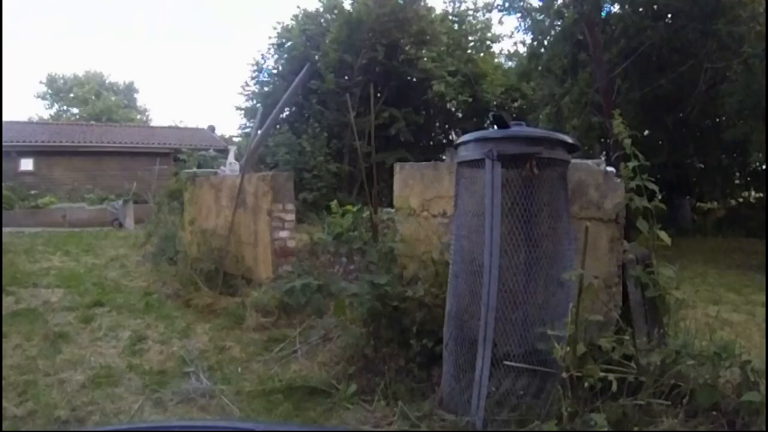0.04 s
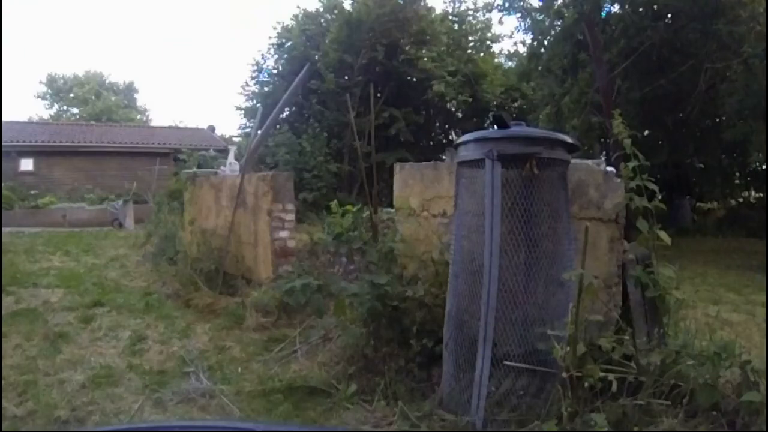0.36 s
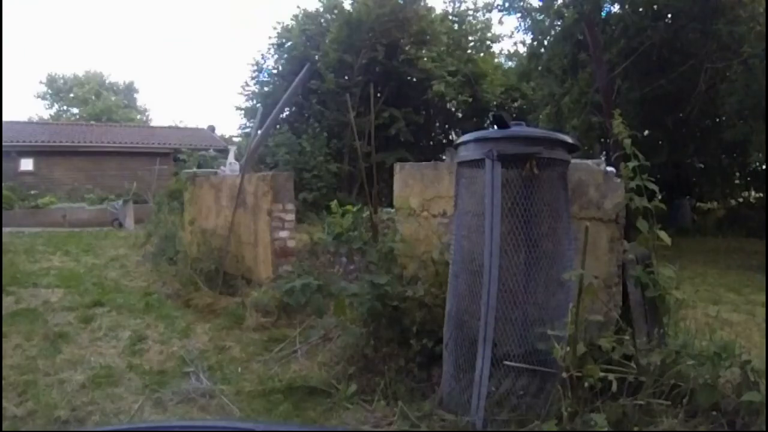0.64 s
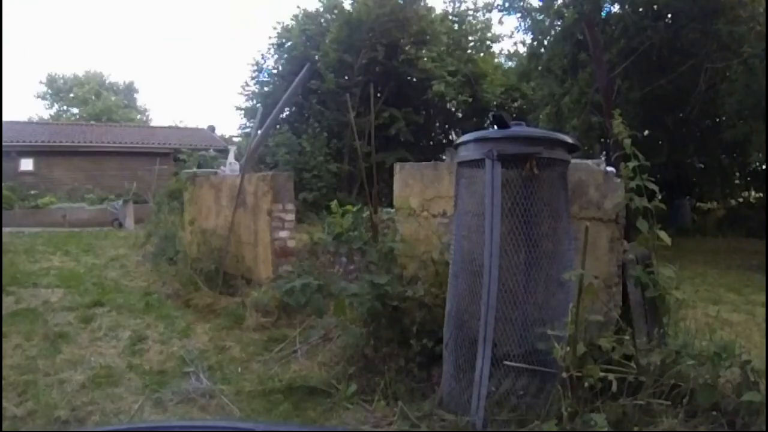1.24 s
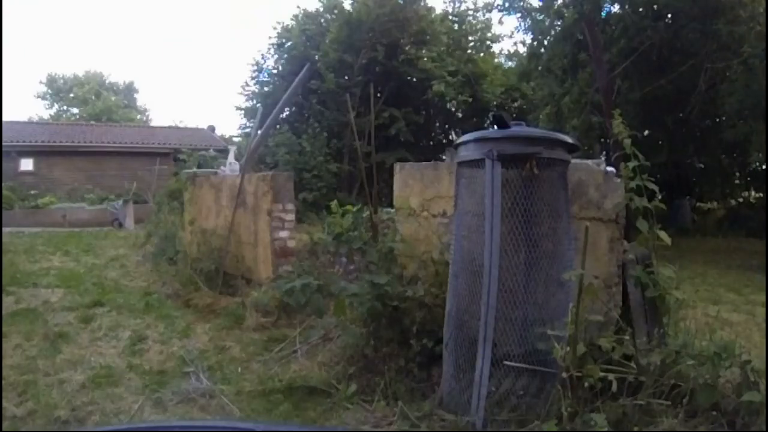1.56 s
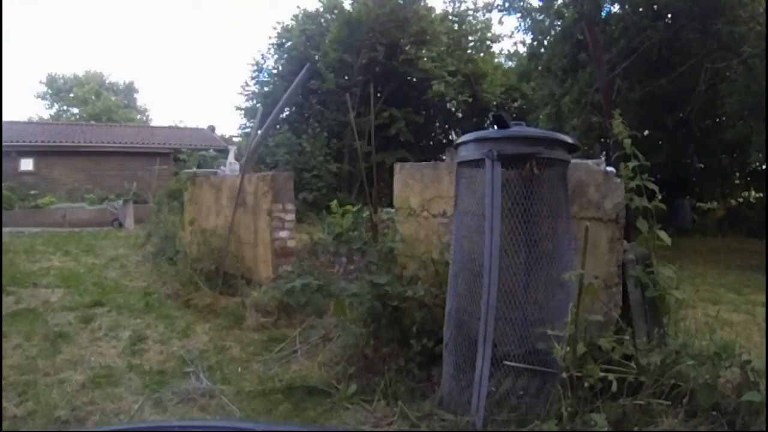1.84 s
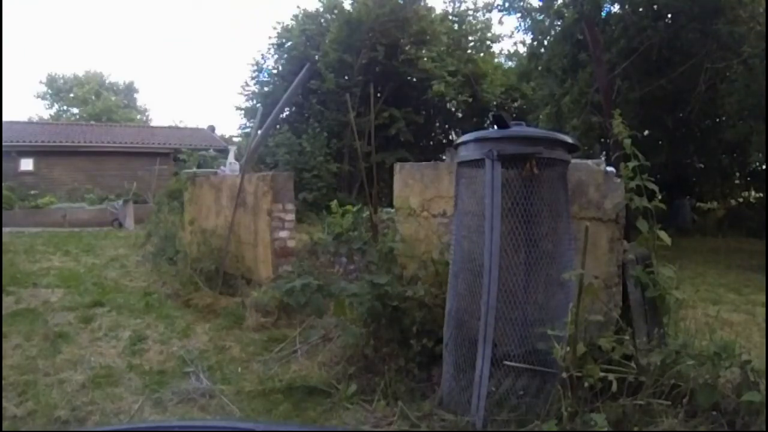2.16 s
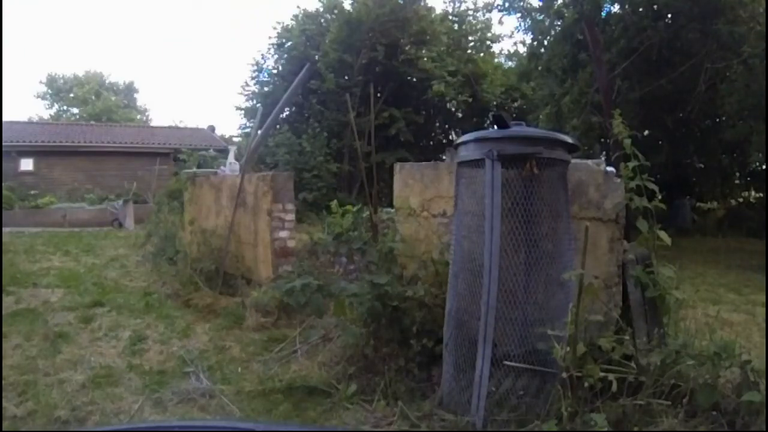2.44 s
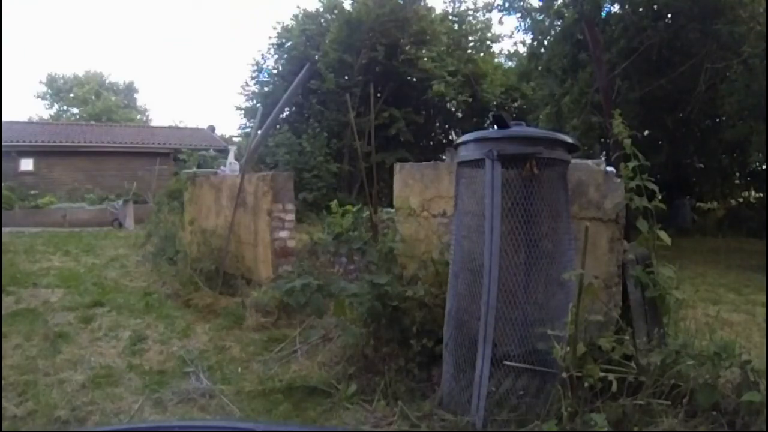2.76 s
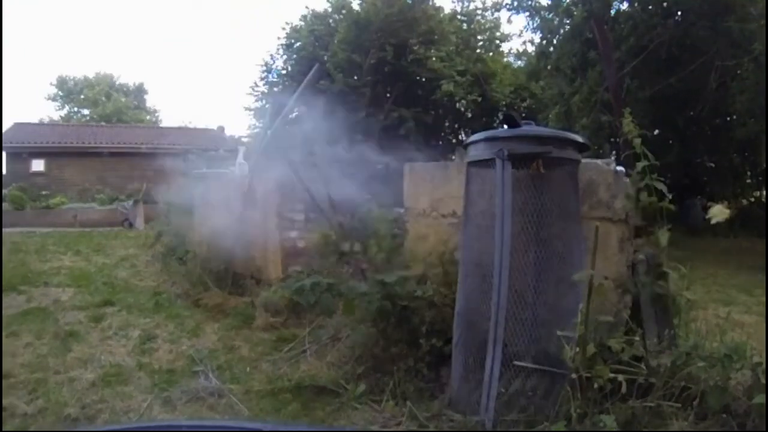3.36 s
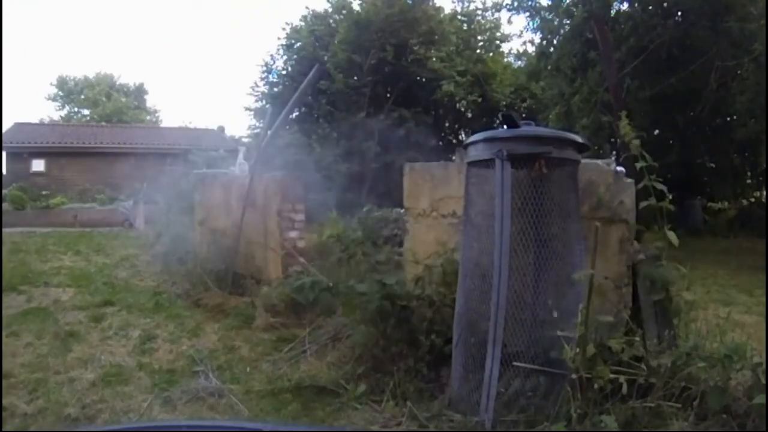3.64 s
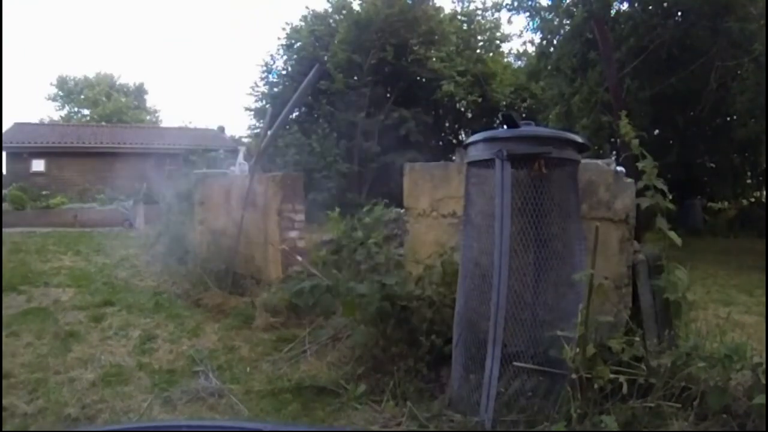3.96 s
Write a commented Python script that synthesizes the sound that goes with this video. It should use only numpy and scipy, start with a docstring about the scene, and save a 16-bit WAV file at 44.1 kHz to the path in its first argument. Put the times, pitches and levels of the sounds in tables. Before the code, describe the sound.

A spud cannon shot hits a plastic trash can in a quiet yard. First there is a faint low rumble and thin electronic whine, with a tiny igniter click near 1.1 seconds and a clearer one at 2.1. At 3.2 seconds a split-second gas hiss ends in a loud, distorted slam beside the microphone. Echoes roll back from a wall and trees, and bits patter down from 3.6 to 4 seconds.

```python
"""A quiet yard, one camera microphone beside a plastic trash can. A spud cannon's igniter clicks in vain,
then gas rushes out ever harder and the slug slams into the can, overloading the microphone. A wall and
the tree line throw the bang back, and bits of the slug patter down. Under it lie a low outdoor rumble
and the camera's thin whine."""
import sys
import numpy as np
from scipy import signal
from scipy.fft import rfft, irfft, next_fast_len
from scipy.io import wavfile
from scipy.ndimage import uniform_filter1d, map_coordinates

SR = 44100
rng = np.random.default_rng(int(sys.argv[2]) if len(sys.argv) > 2 else 0)


def bounce(signal):
    """Save signal as a 16-bit WAV file at the path given by the first command-line argument."""
    frames = np.transpose(np.atleast_2d(signal))
    limited = np.clip(frames, -1, 1)
    pcm = np.round(limited * 32767).astype(np.int16)
    wavfile.write(sys.argv[1], SR, pcm)


N = 176400

SLAM_S, PUSH_S, PUSH_DB, RING_DELAY_S = 3.2378, .0012, 17, .0011
CRACK_DB, CRACK_T60_S = -4.5, .095
# modes of the can, close up: pitch_hz, level_db, t60_s
CAN_MODES = [(42, -14, .2), (138, -7, .25), (178.5, -4, .24), (238, -3, .11), (310, -7, .1), (443, -2, .1),
             (510, -8, .07), (595, -9, .1), (790, -9, .11), (975, -5, .085), (1380, -19, .16),
             (1590, -10, .06), (1740, 22, .0095), (1990, -11, .09)]
# spectra of the bursting slug, the gas jet and the igniter: freq_hz, level_db
CRACK_COLOUR = [(40, -6), (300, -1), (1000, -3), (2400, -6), (4000, -12), (7000, -25), (15000, -38)]
JET_COLOUR = [(60, -18), (120, -10), (300, -13), (750, -4), (1080, -5), (1250, -12), (1850, 1), (2400, -2),
              (2950, -10), (3500, -2), (4000, -6), (4500, -1.5), (6000, -11), (7500, -11), (10400, -5),
              (11800, -7), (13000, -13), (15000, -17)]
CLICK_COLOUR = [(200, -20), (600, -8), (1700, 4), (2700, -4), (3600, -1), (5000, -9), (6600, -4),
                (8800, -11), (10400, -1), (12500, -14), (15000, -15)]
JET_START_S, JET_PEAK_S, JET_END_S = 3.171, 3.2245, 3.24
JET_DB, JET_SWELL_DB, JET_CURVE, JET_T60_S = -8, 34, 1.45, .022
# igniter snaps: start_s, level_db
CLICKS = [(1.066, -50), (2.0905, -30), (2.176, -56)]
CLICK_T60_S, CLICK_ROOM_DB = .016, -9

# returns of the bang, near to far: peak_s, level_db, rise_s, t60_s
YARD_ECHO = (3.255, -15.5, .01, .72)
WALL_ECHO = (3.322, -11.5, .012, .065)
TREE_ECHO = (3.455, -17, .17, .28)
HOLLOW_ECHO = (3.46, -30, .15, .45)
FAR_ECHO = (3.58, -32, .1, .85)
# spectra of those returns: freq_hz, level_db
YARD_COLOUR = [(24, -45), (40, -15), (191, 1), (422, -12), (554, -7), (980, -8), (1220, -17), (1350, -8),
               (1530, -18), (2510, -16), (3740, -19), (4030, -23), (7120, -37), (10100, -37), (15000, -49)]
WALL_COLOUR = [(50, 0), (130, 4), (400, -14), (800, 2), (1100, -8), (1600, -8), (2500, -22), (8000, -50)]
TREE_COLOUR = [(24, -48), (40, -18), (108, -10), (128, -15), (164, -2), (251, -18), (337, -9), (382, -28),
               (422, -16), (659, -14), (746, -2), (1320, -27), (1780, -21), (2450, -30), (3650, -32),
               (10100, -54), (15000, -67)]
FAR_COLOUR = [(40, -10), (135, 12), (200, -4), (500, -12), (900, -9), (1300, -21), (2200, -22), (5000, -34),
              (12000, -64)]
# resonances of the hollow-sounding return: pitch_hz, width_hz, level_db
HOLLOW_PEAKS = [(748, 22, 0), (815, 40, -6), (172, 25, 1)]
# decay of the scatter close by: freq_hz, t60_s
SCATTER_T60 = [(200, .35), (3000, .35), (7000, .2), (14000, .1)]

# bits of slug landing: start_s, ring_db, pitch_hz, t60_s, tick_db
BITS = [(3.63, -50, 1000, .03, -38), (3.671, -43, 1550, .04, -56), (3.7485, -21, 790, .055, -25),
        (3.7985, -35, 1010, .025, -31), (3.833, -35, 966, .04, -54), (3.883, -41, 900, .08, -49),
        (3.929, -45, 1740, .03, -60), (3.938, -53, 4600, .015, -56), (3.9635, -33, 1100, .07, -60),
        (3.977, -42, 950, .06, -64)]
# modes of a landing: pitch_ratio, level_db
BIT_MODES = [(.42, -14), (1, 0), (1.2, -7), (1.8, -11)]
TICK_T60_S, THUD_DB, BIT_ROOM_DB = .007, -3, -11
# fine crumbs sifting through leaves: peak_s, level_db, rise_s, t60_s
CRUMBS = (3.86, -47, .6, 2.5)
# spectra of the debris: freq_hz, level_db
TICK_COLOUR = [(200, 0), (1500, 0), (2700, -7), (4800, -4), (6500, -12), (12000, -16), (15000, -28)]
THUD_COLOUR = [(100, -6), (300, 0), (1000, 0), (1900, -4), (2600, -17), (6000, -30), (14000, -45)]
CRUMB_COLOUR = [(100, -15), (950, 0), (1300, -5), (1900, -3), (2600, -10), (4800, -11), (7000, -21),
                (14000, -34)]

AIR_DB, AIR_WAVER_DB, AIR_WAVER_HZ = -53, .7, 8
# spectra of the open air and the leaves: freq_hz, level_db
AIR_COLOUR = [(12, -18), (22, 0), (52, 1), (66, -4), (90, -11), (140, -14), (310, -19), (410, -19),
              (480, -17), (560, -23), (980, -25), (1300, -31), (2600, -31), (3300, -36), (5500, -38),
              (7100, -42), (8600, -40), (9500, -46), (11000, -43), (13000, -48), (14200, -49), (15000, -58)]
RUSTLE_COLOUR = [(100, -12), (400, 1), (900, 0), (1400, -12), (2200, -10), (4500, -15), (14000, -27)]
# one stir of leaves: peak_s, level_db, rise_s, t60_s
RUSTLE = (1.76, -57, .3, .3)
# the camera's hiss bands: pitch_hz, width_hz, level_db
WHINE_PEAKS = [(11230, 580, 0), (10100, 500, -10)]
# its steady tones: pitch_hz, level_db
WHINE_TONES = [(2640, -82), (3110, -88), (10330, -92)]
WHINE_DB, BLIP_HZ, BLIP_DB = -73, 11950, -75
BLIP_S, BLIP_PERIOD_S, BLIP_START_S = .007, .0625, .0215
# fade-in of the background: time_s, gain_db
FADE_IN = [(.1, -70), (.115, -11), (.3, -6), (.52, 0)]

GAIN_TRIP_DB, GAIN_CUT_DB, GAIN_RECOVER_DB_PER_S = -14, 10, 15
GAIN_SENSE_S, GAIN_REACT_S, GAIN_HOLD_S = .004, .0175, .23
CLIP_HARDNESS, TOP_HZ = 5, 15200


def slam():
    """The slug hits beside the microphone: one pressure push, the can's ring, the crack as it bursts."""
    age = np.maximum(clock() - SLAM_S, 0) / PUSH_S
    push = -amp(PUSH_DB) * age * (2 - age) * np.exp(-age)
    crack = amp(CRACK_DB) * decay(SLAM_S + RING_DELAY_S, CRACK_T60_S) * noise(CRACK_COLOUR)
    return push + ring(SLAM_S + RING_DELAY_S, CAN_MODES) + crack


def gas_jet():
    """Turbulent gas swells to a loud hiss, holds, and dies just after the slug hits."""
    t = clock()
    to_go = np.clip((JET_PEAK_S - t) / (JET_PEAK_S - JET_START_S), 0, 1)
    fall_db = 60 * np.maximum(t - JET_END_S, 0) / JET_T60_S
    level_db = JET_DB - JET_SWELL_DB * to_go ** JET_CURVE - fall_db
    return (t > JET_START_S) * amp(level_db) * noise(JET_COLOUR)


def igniter():
    """Dry snaps of the spark button, with a little of the yard around them."""
    snaps = noise(CLICK_COLOUR) * sum(amp(db) * decay(start_s, CLICK_T60_S) for start_s, db in CLICKS)
    return snaps + amp(CLICK_ROOM_DB) * near_scatter(snaps)


def echoes():
    """The bang comes back, diffused, from the yard, a wall, the tree line and the far distance."""
    paths = [(YARD_ECHO, YARD_COLOUR), (WALL_ECHO, WALL_COLOUR),
             (TREE_ECHO, TREE_COLOUR), (FAR_ECHO, FAR_COLOUR)]
    diffuse = sum(swell(*path) * noise(colour) for path, colour in paths)
    hollow = swell(*HOLLOW_ECHO) * resonant_noise(HOLLOW_PEAKS)
    return (clock() > SLAM_S) * (diffuse + hollow)


def debris():
    """Each bit lands with a short ring, a leafy thud and a tick; crumbs sift through the leaves."""
    ticks, thuds, landings = noise(TICK_COLOUR), noise(THUD_COLOUR), np.zeros(N)
    for start_s, ring_db, pitch_hz, t60_s, tick_db in BITS:
        modes = []
        for ratio, mode_db in BIT_MODES:
            detune, spread_db = rng.normal(1, .015), rng.normal(0, 1.5)
            mode_hz = pitch_hz * ratio * detune
            modes.append((mode_hz, ring_db + mode_db + spread_db, t60_s / np.sqrt(ratio)))
        thud = amp(ring_db + THUD_DB) * decay(start_s, t60_s) * thuds
        tick = amp(tick_db) * decay(start_s, TICK_T60_S) * ticks
        landings += ring(start_s, modes) + thud + tick
    crumbs = (clock() > SLAM_S) * swell(*CRUMBS) * noise(CRUMB_COLOUR)
    return landings + amp(BIT_ROOM_DB) * near_scatter(landings) + crumbs


def near_scatter(x):
    """Short reflections off nearby walls and bushes; the treble dies first."""
    hz, t, spectrum = signal.stft(rng.standard_normal(SR // 2), SR, nperseg=256)
    damping = amp(-60 * t / along(SCATTER_T60, hz)[:, None])
    tail = signal.istft(spectrum * damping, SR, nperseg=256)[1]
    return signal.fftconvolve(x, tail / np.linalg.norm(tail))[:N]


def outdoor_air():
    """A low, slightly wavering rumble all round, and one stir of leaves."""
    knots = rng.standard_normal(int(N * AIR_WAVER_HZ / SR) + 4)
    waver = map_coordinates(knots, [clock() * AIR_WAVER_HZ])
    rumble = amp(AIR_DB + AIR_WAVER_DB * waver) * noise(AIR_COLOUR)
    return rumble + swell(*RUSTLE) * noise(RUSTLE_COLOUR)


def camera_whine():
    """The camera's own noise: a narrow hiss, steady tones and high pulsing blips."""
    t = clock()
    tones = sum(amp(db) * np.sqrt(2) * np.sin(2 * np.pi * hz * t) for hz, db in WHINE_TONES)
    gate = np.sin(np.pi * np.minimum((t - BLIP_START_S) % BLIP_PERIOD_S / BLIP_S, 1))
    blips = amp(BLIP_DB) * gate * 2 * np.sin(2 * np.pi * BLIP_HZ * t)
    return amp(WHINE_DB) * resonant_noise(WHINE_PEAKS) + tones + blips


def gain_control(x):
    """A loud sound makes the camera's gain step down a moment later, hold, then creep back."""
    t = clock()
    loud = uniform_filter1d(x * x, int(GAIN_SENSE_S * SR)) > amp(GAIN_TRIP_DB) ** 2
    since_loud_s = t - np.maximum.accumulate(np.where(loud, t, -10))
    recovered_db = GAIN_RECOVER_DB_PER_S * np.maximum(since_loud_s - GAIN_HOLD_S, 0)
    cut_db = np.maximum(GAIN_CUT_DB - recovered_db, 0)
    return x * amp(-np.interp(t - GAIN_REACT_S, t, cut_db))


def amp(db):
    """Decibels to gain."""
    return 10 ** (np.asarray(db) / 20)


def clock():
    """Time of every sample, in seconds."""
    return np.arange(N) / SR


def along(points, hz):
    """Rows of freq_hz, value, read on a log frequency axis."""
    freqs, values = np.transpose(points)
    return np.interp(np.log(hz + 1), np.log(freqs + 1), values)


def filtered(x, response):
    """x through a frequency response."""
    size = next_fast_len(N + 8192)
    return irfft(rfft(x, size) * response(np.fft.rfftfreq(size, 1 / SR)), size)[:N]


def noise(colour):
    """Coloured noise of rms 1."""
    x = filtered(rng.standard_normal(N), lambda hz: amp(along(colour, hz)))
    return x / x.std()


def resonant_noise(peaks):
    """Noise of rms 1 in a few resonances."""
    def response(hz):
        return sum(amp(db) * (1j * hz * width / (pitch ** 2 - hz ** 2 + 1j * hz * width)) ** 2
                   for pitch, width, db in peaks)
    x = filtered(rng.standard_normal(N), response)
    return x / x.std()


def decay(start_s, t60_s):
    """A sudden start, then an exponential fall."""
    t = clock() - start_s
    return (t >= 0) * amp(-60 * np.abs(t) / t60_s)


def swell(peak_s, level_db, rise_s, t60_s):
    """Climbs 20 dB per rise_s up to the peak, then dies away."""
    t = clock() - peak_s
    return amp(level_db + 20 * np.minimum(t, 0) / rise_s - 60 * np.maximum(t, 0) / t60_s)


def ring(start_s, modes):
    """Damped sines struck together: pitch_hz, level_db, t60_s."""
    t, start = np.arange(SR) / SR, round(start_s * SR)
    track = np.zeros(N + 2 * SR)
    for hz, db, t60_s in modes:
        track[start:start + SR] += amp(db - 60 * t / t60_s) * np.sin(2 * np.pi * hz * t)
    return track[:N]


def scene():
    """The yard at the one microphone, the background fading in under the shot."""
    shot = igniter() + gas_jet() + slam() + echoes() + debris()
    fade = amp(np.interp(clock(), *np.transpose(FADE_IN)))
    return (shot + fade * (outdoor_air() + camera_whine()))[None]


def record(dry):
    """The camera turns its gain down on the loud hiss, still clips on the slam, cuts the top treble."""
    x = gain_control(dry[0])
    clipped = x / (1 + np.abs(x) ** CLIP_HARDNESS) ** (1 / CLIP_HARDNESS)
    return filtered(clipped, lambda hz: np.clip((TOP_HZ - hz) / 300 + .5, 0, 1))[None]


dry = scene()
out = record(dry)
bounce(out)
```